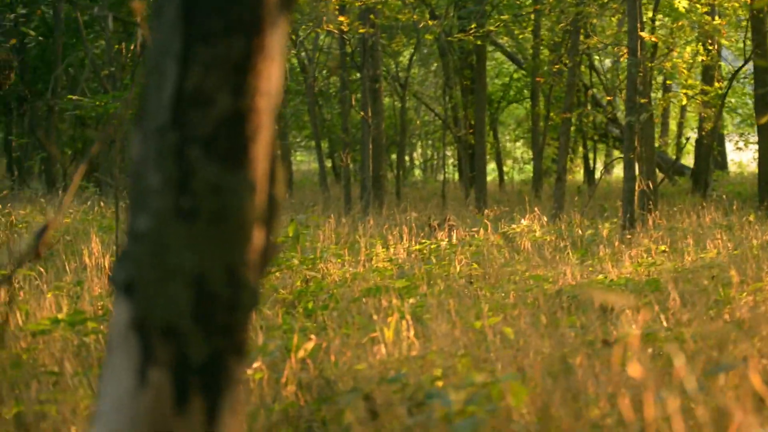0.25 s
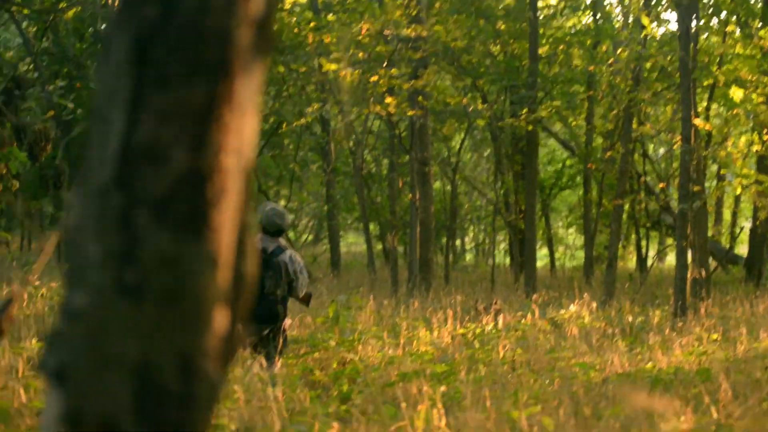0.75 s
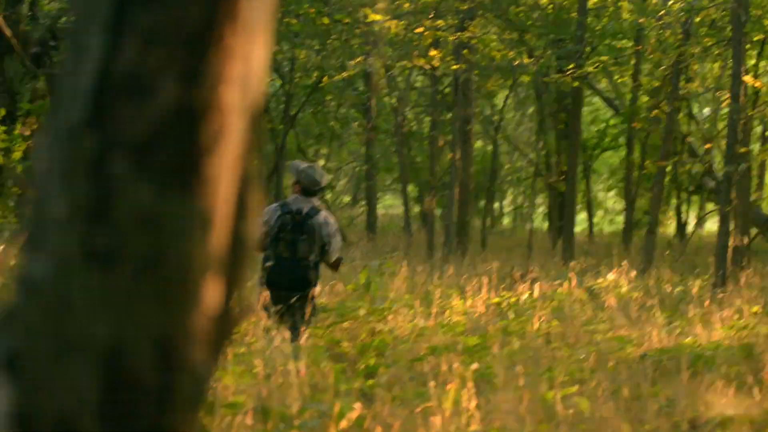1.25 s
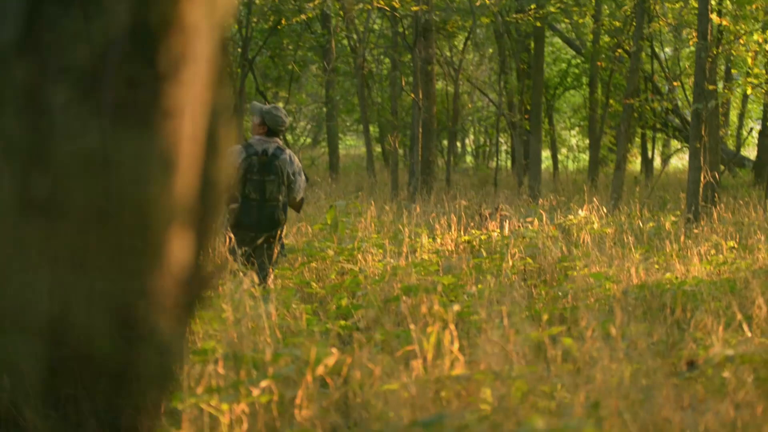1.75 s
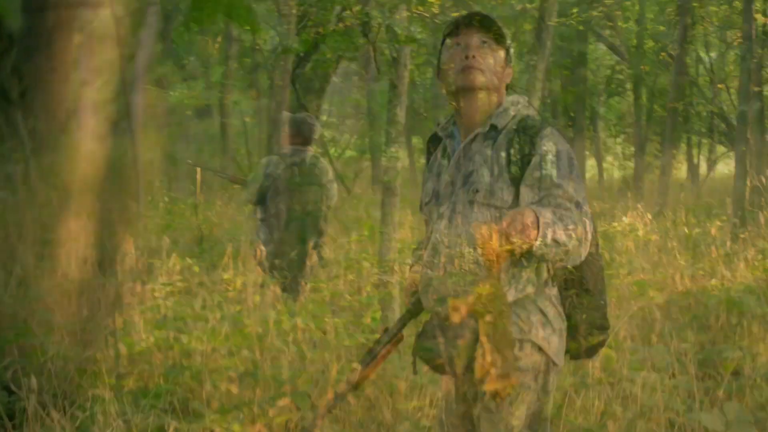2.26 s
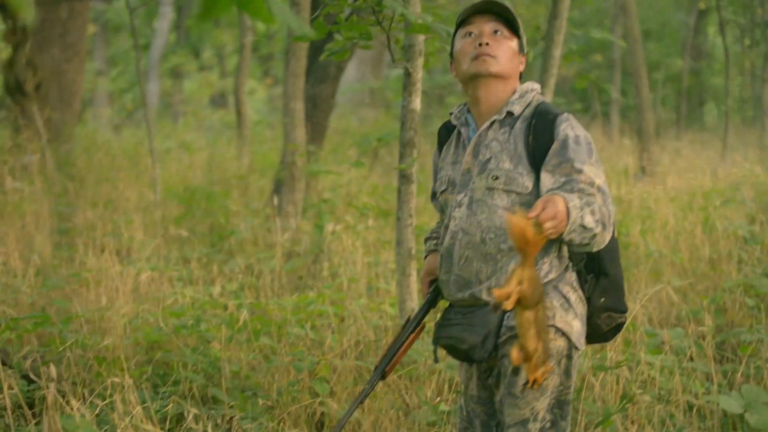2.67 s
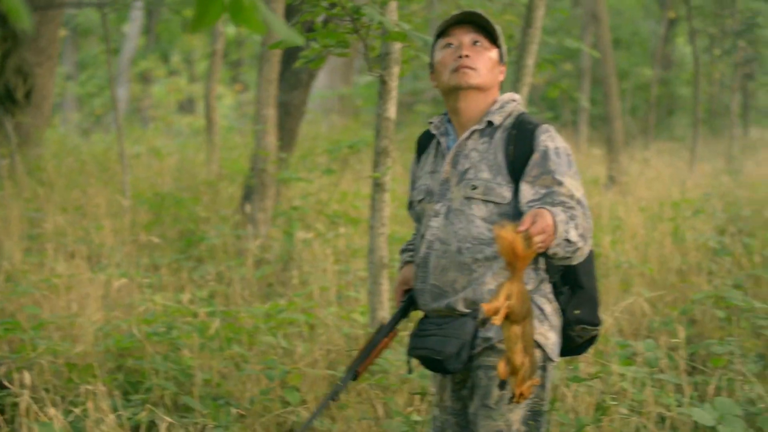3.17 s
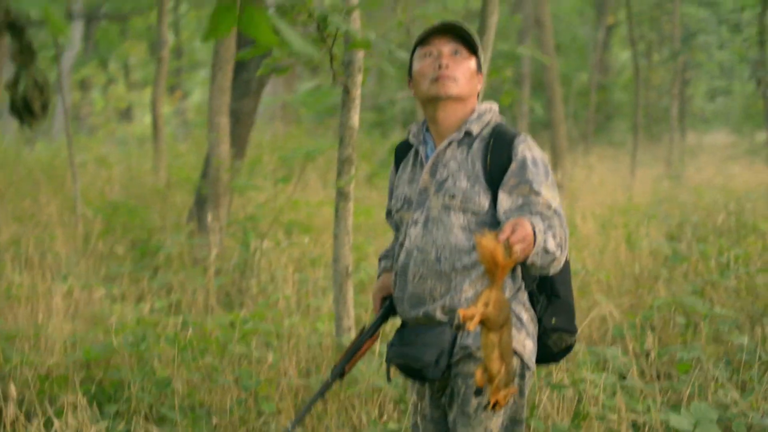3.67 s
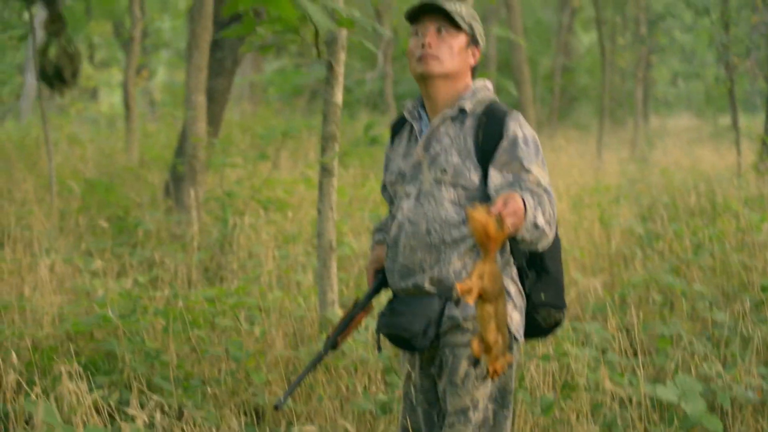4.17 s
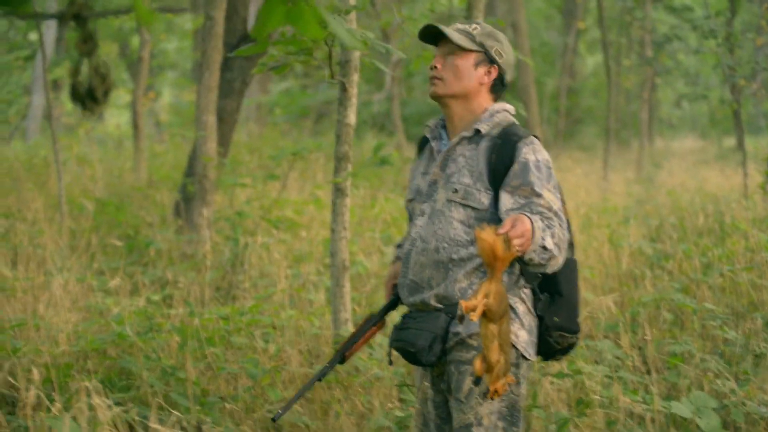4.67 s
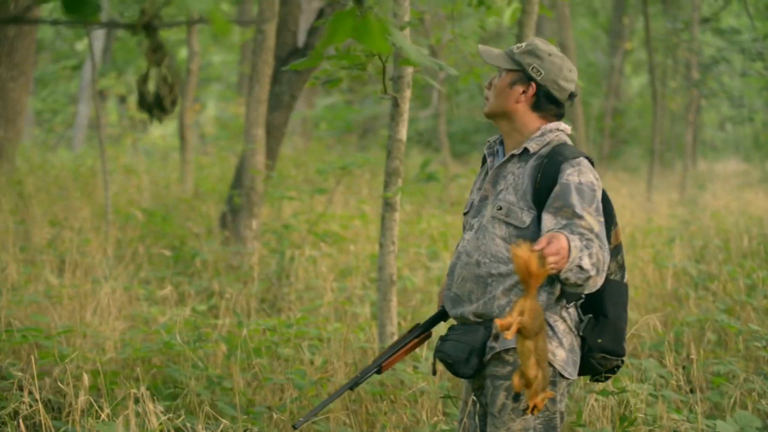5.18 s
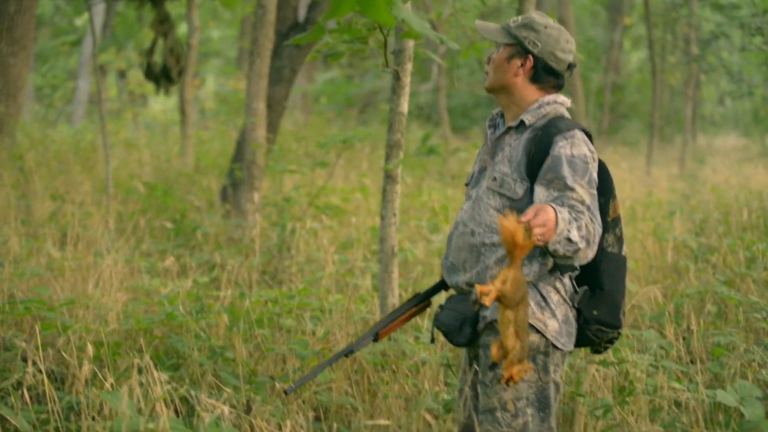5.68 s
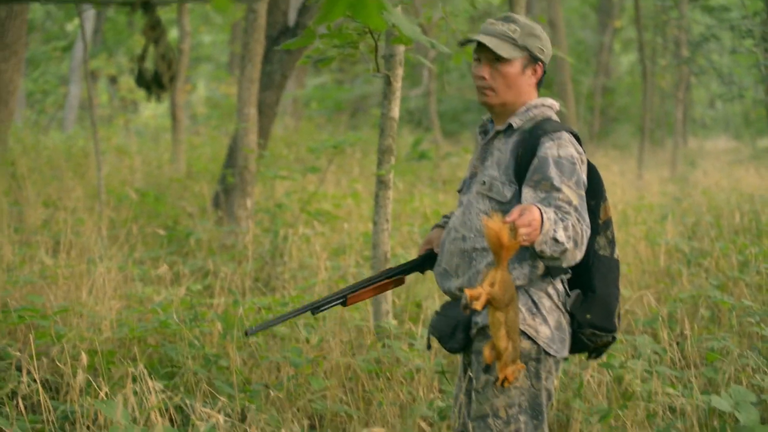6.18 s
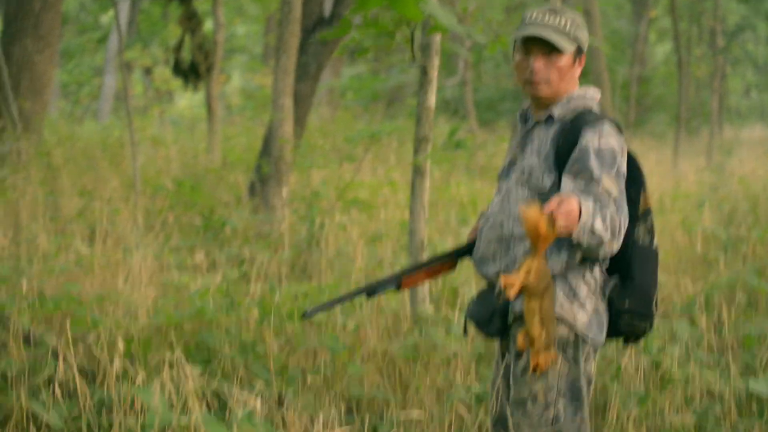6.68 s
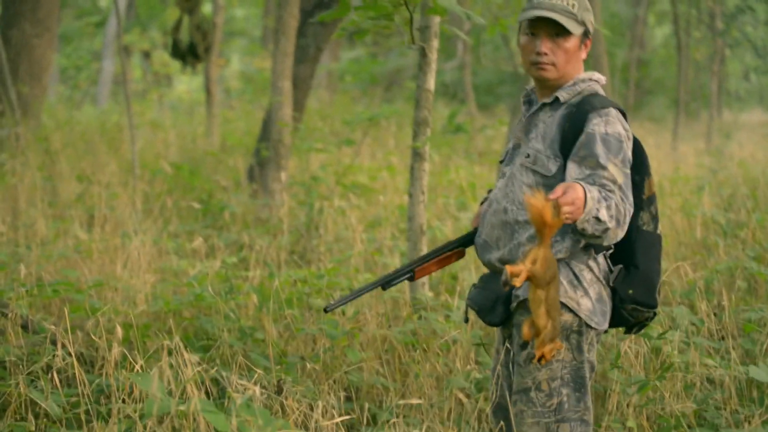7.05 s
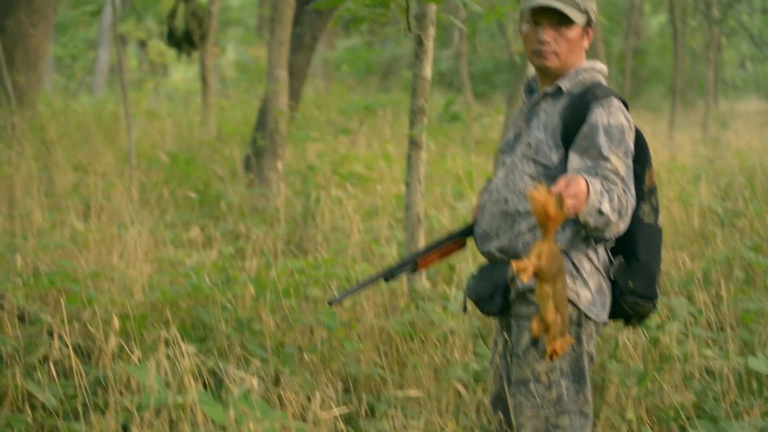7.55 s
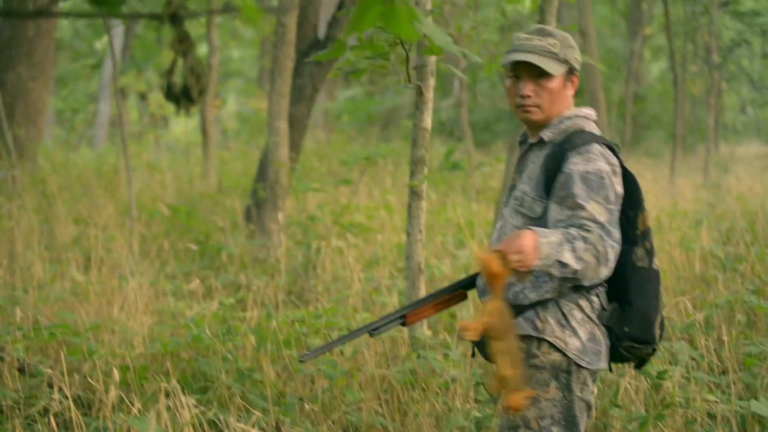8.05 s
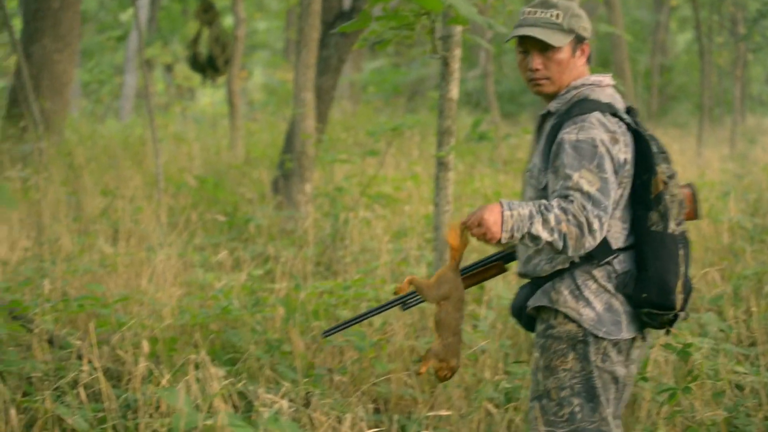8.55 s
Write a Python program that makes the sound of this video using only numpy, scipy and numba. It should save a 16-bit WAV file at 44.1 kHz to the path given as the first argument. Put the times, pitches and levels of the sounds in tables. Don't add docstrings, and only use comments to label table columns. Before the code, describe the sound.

Summer woodland, one centred microphone, with faint low traffic rumble and breeze beneath. From 0 s a near cicada grinds out buzzing phrases over a bright hissing insect chorus, peaking about 0.1, 0.8 and 1.5 s; each drone swells, clicks faster, drops in pitch and opens into a rasp, then shuts. Dry grass swishes around 0.7 and 1.2 s, stems snap, and a twig cracks sharply at 0.55 s. At 1.66 s the place changes abruptly: insects dip, recovering by 2.1 s. A slightly higher cicada then repeats every 0.7-0.8 s from 2.5 s, growing louder and quicker to the end at 8.8 s. Neighbouring cicadas add short steady hums. Shifting feet make light rustles and ticks, mostly 2.6-4.2 s, with few later. A faint bird slurs downward at 5.6 and 6.3 s, then gives eight evenly spaced chips until about 8.2 s.

```python
import sys
import numpy as np
from scipy import signal
from scipy.fft import rfft, irfft
from scipy.io import wavfile
from scipy.ndimage import uniform_filter1d
from numba import njit

SR = 44100
rng = np.random.default_rng(int(sys.argv[2]) if len(sys.argv) > 2 else 0)


def wav_out(sig):
    wavfile.write(sys.argv[1], SR, np.round(np.clip(np.atleast_2d(sig).T, -1, 1) * 32767).astype(np.int16))


def level_to_linear(level):
    exponent = np.asarray(level, float) / 20
    return 10 ** exponent


N = 388521
T = np.arange(N) / SR
CUT_S = 1.66


def level(x, db):
    return x * level_to_linear(db) / np.sqrt(np.mean(x ** 2))


def curve(table):
    return np.interp(T, *np.transpose(table))


@njit
def svf(x, hz, q):
    y, b, l, k = np.empty(len(x)), 0., 0., 1 / q
    for i in range(len(x)):
        g = np.tan(np.pi * hz[i] / SR)
        v = (b + g * (x[i] - l)) / (1 + g * (g + k))
        b, l, y[i] = 2 * v - b, l + 2 * g * v, k * v
    return y


def ring(x, hz, q, passes=2):
    centre_hz = np.full(N, hz, dtype=np.float64)
    for _ in range(passes):
        x = svf(x, centre_hz, q)
    return x


def colour(x, shape):
    hz, db = np.transpose(shape)
    f = np.log(np.fft.rfftfreq(N, 1 / SR) + 1)
    return irfft(rfft(x) * level_to_linear(np.interp(f, np.log(hz), db)), N)


def walk(rate):
    k = int(SR / rate)
    held = np.repeat(rng.standard_normal(N // k + 1), k)
    return 1.46 * uniform_filter1d(uniform_filter1d(held, k), k)[:N]


def trees(x, t60_s, wet_db):
    t = T[:SR // 2]
    tail = rng.standard_normal(len(t)) * level_to_linear(-60 * t / t60_s) * np.minimum(t / 0.011, 1)
    tail = level(tail, wet_db) / np.sqrt(len(t))
    first = T < CUT_S
    wet_first = signal.fftconvolve(x * first, tail)[:N] * first
    wet_later = signal.fftconvolve(x * ~first, tail)[:N] * ~first
    return x + wet_first + wet_later


# t/s, level/dB
RUMBLE_DB = [(0, -57), (1.64, -66), (1.8, -66.5), (2.1, -56.5), (3, -57.5), (4.4, -63.5), (8.81, -63)]


def rumble():
    noise = level(ring(rng.standard_normal(N), 140, 1.65, passes=1), -5)
    return noise * level_to_linear(curve(RUMBLE_DB) + 1.04 * walk(2.75))


# f/Hz, level/dB per Hz
AIR = [(15, -40), (25, -5), (138, 1), (243, -5), (403, -4.5), (629, -8), (1510, -11), (1830, -15),
       (2100, -20), (2600, -14.5), (3380, -21), (5720, -120)]


def open_air():
    return level(colour(rng.standard_normal(N), AIR), -64) * level_to_linear(0.91 * walk(3.58))


# t_mid/s, level/dB, half length/s
GUSTS = [
    (2.2, -64, .25),
    (3.9, -63.5, 0.33),
    (4.9, -67.5, .3),
    (5.9, -66.5, 0.39),
    (8.6, -66.5, .4),
]


def breeze():
    gusts = sum(level_to_linear(db) * np.exp(-((T - s) / half_s) ** 4) for s, db, half_s in GUSTS)
    return level(ring(rng.standard_normal(N), 360, 1.0), 0) * gusts


# f/Hz, level/dB per Hz
FIRST_CHORUS = [(1500, -56), (2300, -28.5), (2900, -23.5), (3300, -7), (4100, -8), (5100, 1.5), (6000, 0),
                (6700, -17), (7600, -12.5), (8200, -17.5), (8800, -30), (12000, -32), (15700, -24)]
LATER_CHORUS = [(1500, -53), (2300, -35), (2900, -23.5), (3300, -11), (4200, -7), (5100, 1.5), (5900, -2),
                (6900, -9), (7500, -16.5), (8200, -16.5), (8900, -28.5), (12300, -39), (14700, -30.5),
                (15700, -36)]
# t/s, level/dB
CHORUS_DB = [(0, -28), (1.656, -32), (1.664, -23), (2.3, -33), (4, -30.5), (6, -29), (8, -26),
             (8.81, -27.5)]


def chorus():
    white, bands, swell = rng.standard_normal(N), 0, walk(1.29)
    for hz in 1900 * 2 ** np.arange(0, 3.2, 1 / 3):
        flicker = level_to_linear(0.79 * swell + 3.2 * walk(6.5))
        bands = bands + ring(white, hz, 3.4, passes=1) * flicker / np.sqrt(hz)
    before = level(colour(bands, FIRST_CHORUS), 0)
    after = level(colour(bands, LATER_CHORUS), 0)
    return np.where(T < CUT_S, before, after) * level_to_linear(curve(CHORUS_DB))


# t/s, level/dB
SLURS = [
    (5.56, -68),
    (6.328, -62),
]
# length/s, f_start/Hz, f_end/Hz
SLUR = (.15, 2050, 1530)
CHIP_DB = [-66, -54.5, -53.5, -54.5, -58, -56, -56, -57]
# length/s, f_start/Hz, f_end/Hz
CHIP = (.028, 1800, 2040)


def bird():
    chips_s, chip_gap_s = 6.642, .2242
    chip_bend = 2.3
    echo_s, echo_db = 0.066, -8
    notes = [(s, db, *SLUR, 1) for s, db in SLURS]
    notes += [(chips_s + k * chip_gap_s, db, *CHIP, chip_bend) for k, db in enumerate(CHIP_DB)]
    out = np.zeros(N)
    for s, db, length_s, hz0, hz1, bend in notes:
        u = np.clip((T - s) / length_s, 0, 1)
        cycles = np.cumsum(hz0 + (hz1 - hz0) * u ** bend) / SR
        out += level_to_linear(db) * np.sin(np.pi * u ** .8) * np.sin(2 * np.pi * cycles)
    return trees(out + level_to_linear(echo_db) * np.roll(out, int(echo_s * SR)), 0.33, -1.26)


def clicks(s, size):
    at = np.floor(s * SR)[:, None] + np.arange(-7, 9)
    lag = at - s[:, None] * SR
    taps = np.sinc(lag) * np.cos(lag * np.pi / 16) ** 2 * size[:, None]
    return np.bincount(np.clip(at, 0, N).astype(int).ravel(), taps.ravel(), N + 1)[:N]


def drums(rate_hz, late_ms, loose):
    weak_db, scatter_db, jitter_ms = -5, 1.5, .062
    beats = np.cumsum(rate_hz) / SR
    k = np.arange(1, int(beats[-1]))
    second = k % 2
    s = np.interp(k, beats, T)
    loose = np.interp(s, T, loose + 0 * T)
    late_ms = np.interp(s, T, late_ms + 0 * T)
    chance = rng.standard_normal((2, len(k)))
    size = level_to_linear(weak_db * second + scatter_db * loose * chance[1])
    shift_ms = jitter_ms * loose * chance[0] + late_ms * second
    return clicks(s + shift_ms / 1000, size) * np.sqrt(SR / rate_hz)


# click rate/Hz, lag of the second drum/ms
NEIGHBOURS = [(351, .15), (373.2, .3), (392.6, .15), (393.1, .25)]
NEIGHBOUR_BELLY_HZ = [3200, 3270, 3130, 3900]
# t/s, length/s, level/dB
HUMS = [
    [(1.84, .12, -33.5), (3.42, 0.17, -42.5), (4.42, .12, -39), (5.32, 0.13, -34.5), (6.2, .145, -32),
     (7.95, 0.2, -38)],
    [(7.088, 0.15, -35.5)],
    [(1.69, .11, -30), (8.322, 0.13, -33)],
    [(7.76, 0.19, -40), (8.4, 0.16, -38)],
]


def neighbours():
    out = 0
    for (beat_hz, late_ms), hz, hums in zip(NEIGHBOURS, NEIGHBOUR_BELLY_HZ, HUMS):
        hum = ring(drums(np.full(N, beat_hz), late_ms, loose=0.14), hz, 2.5)
        swells = 0
        for s, length_s, db in hums:
            u = np.clip((T - s) / length_s, 0, 1)
            swells = swells + level_to_linear(db) * np.abs(np.sin(np.pi * u)) ** 0.26
        out = out + level(hum, 0) * swells
    low_cut = signal.cheby2(6, 40, 2350, "high", fs=SR, output="sos")
    return trees(signal.sosfilt(low_cut, out), .15, -5)


# t_mid/s, level/dB, half length/s
STRIDES = [(.15, -63.5, .3), (.7, -52.5, 0.14), (1.2, -52.5, 0.27), (1.633, -60, 0.15),
           (2.079, -69.5, 0.22), (2.78, -59.5, .25), (3.305, -57.5, 0.22), (3.85, -66.5, 0.39),
           (5.0, -69, 0.25), (5.878, -71, .33), (7.69, -73, 0.31), (8.553, -71, 0.43)]


def strides():
    first_stir_db, stir_db = -58.5, -80.5
    first = T < CUT_S
    sweeps = 0
    for s, db, half_s in STRIDES:
        same_spot = first == (s < CUT_S)
        sweeps = sweeps + level_to_linear(db) * np.exp(-np.abs((T - s) / half_s) ** 3.1) * same_spot
    return sweeps + level_to_linear(np.where(first, first_stir_db, stir_db + curve(FADER_DB)))


def snap(s, db, hz, thud_db, body_db, crack_db, cycles=1.54):
    t = T[:2000]
    pulse = 0
    for f, part_db in [(hz, 1.5), (300, thud_db), (1100, body_db), (1850, crack_db)]:
        decay, rise = np.exp(-t * f / cycles), np.minimum(t * f * 2.36, 1)
        pulse = pulse + level_to_linear(part_db) * np.sin(2 * np.pi * f * t) * decay * rise
    out, i = np.zeros(N + len(t)), int(s * SR)
    out[i:i + len(t)] = level_to_linear(db) * pulse
    return out[:N]


# f/Hz, level/dB per Hz
GRASS = [(88, -51), (150, -22), (263, -3), (452, 0), (1090, -1.5), (1280, -0.5), (2190, -7), (2800, -4),
         (3640, -29), (6160, -120)]
# t/s, peak/dB, f/Hz, breadth/dB
WALK_TICKS = [(0.106, -38, 938, -5), (0.269, -43.5, 377, 8), (0.416, -38, 1688, -4), (0.439, -32, 2120, 0),
              (0.473, -38, 1348, -3), (0.505, -44, 557, 3), (0.633, -33, 475, 7), (0.679, -23, 874, 3),
              (0.693, -33, 709, -5), (0.756, -35, 383, -3), (0.885, -40.5, 1170, 8), (0.996, -37, 393, 3),
              (1.064, -19.5, 1271, -19), (1.096, -34, 1016, 2), (1.109, -29, 890, -1.5),
              (1.153, -38, 1540, .1), (1.219, -34, 1275, .1), (1.279, -26, 543, -6),
              (1.363, -26.5, 764, -10), (1.509, -35, 1324, -2.5)]
# t/s, peak/dB, f/Hz, breadth/dB
STAND_TICKS = [(2.615, -44, 2355, .1), (2.694, -41, 1195, -2.5), (2.721, -41, 481.3, 6),
               (2.783, -42, 1276, 4), (2.865, -36, 1360, -1.5), (2.879, -39, 1238, 3),
               (3.129, -40, 666, -1), (3.181, -44, 972, .1), (3.328, -34, 500, 9.5), (3.53, -44, 938, 10),
               (3.686, -49, 342, 2.5), (3.714, -38.5, 1214, -7), (3.81, -47, 1265, 7), (3.972, -37, 920, 8),
               (4.132, -39.5, 2360, -1.5), (4.185, -37, 1254, -10), (4.227, -38, 1354, -17),
               (4.867, -49, 883, 2.5), (6.641, -37, 2415, -3), (7.148, -41.5, 531, 6), (7.452, -49, 297, 5)]
TWIG_S = [.5461, .5482, .5533, .5602]
# peak/dB, f/Hz
TWIG = [
    (-6.5, 2120),
    (-13.5, 755),
    (-22.5, 1500),
    (-39.5, 1300),
]


def walker():
    chance = rng.random((2, N))
    crackle = (chance[0] < 2500 / SR) * level_to_linear(-2.2 * np.log(chance[1] + 1e-3)) * rng.standard_normal(N)
    swish = level(colour(crackle, GRASS), 0) * strides() * level_to_linear(0.51 * walk(34))
    snaps = 0
    for s, db, hz, wide_db in WALK_TICKS + STAND_TICKS:
        thud_db = -19.5 + wide_db - 0.65 * (db + 48)
        snaps = snaps + snap(s, db, hz, thud_db, -6 + wide_db, -1 + wide_db)
    for s, (db, hz) in zip(TWIG_S, TWIG):
        snaps = snaps - snap(s, db, hz, -11.5, -32, 4, cycles=0.91)
    splinter = level_to_linear(-21) * ring(rng.standard_normal(N), 8000, 8.6, passes=1)
    splinter = splinter * np.exp(-np.abs(T - .553) / 0.02) * (T > TWIG_S[0])
    low_cut = signal.butter(3, 150, "high", fs=SR, output="sos")
    return trees(swish + signal.sosfilt(low_cut, snaps) + splinter, .12, -13)


RIBS = [(23, .6), (41, .55)]


def ribs(drum):
    for late, share in RIBS:
        taps = np.r_[1, np.zeros(late - 1), -share]
        drum = signal.lfilter(taps[::-1], taps, drum)
    return drum


def belly(drum, hz, opening, quick, first):
    wide_db, wide_gain_db, first_wide_db = -11.5, 23, -7.5
    low_hz, low_db, later_low_db = 3360, -4.5, -11
    sharp_db, sharp_q = -16.5, 105
    main = level(ring(drum, hz, 5.17), 0)
    wide_db = wide_db + (wide_gain_db + first_wide_db * first) * opening ** 0.73 * quick
    wide = level(ring(ribs(drum), .6 * hz + 2000, 2.1), 0) * level_to_linear(uniform_filter1d(wide_db, size=300))
    low = level(ring(drum, low_hz, 4.5), low_db) * np.where(first, 1, level_to_linear(later_low_db))
    low = low * quick ** 4 * level_to_linear(11.5 * opening ** 2)
    sharp = level(ring(drum, hz, sharp_q, passes=1), sharp_db) * (1 - quick)
    edges = signal.cheby2(6, 40, (2450, 9000), "band", fs=SR, output="sos")
    return signal.sosfilt(edges, main + wide + low + sharp)


# t_climax/s, drone level/dB, climax level/dB
PHRASES = [(.125, -33.5, -24), (.835, -34, -24.5), (1.545, -33.5, -30), (2.51, -40, -27.5),
           (3.335, -40, -26), (4.139, -37.5, -24), (4.93, -35.5, -22.5), (5.71, -34, -23.5),
           (6.475, -33.5, -21.5), (7.225, -32.5, -22.5), (7.97, -31.5, -21.5), (8.715, -31, -20.5)]
# t from climax/s, quickening 0-1, climax share 0-1, belly f/Hz
COURSE = [
    (-0.6, .01, .01, 5020),
    (-.5, .01, .03, 5660),
    (-.2, .05, 0.3, 5667),
    (-.08, 0.28, 0.27, 5750),
    (-.03, 0.62, 0.65, 5600),
    (.01, .85, 0.9, 5430),
    (0.056, 1.1, 0.66, 4700),
    (.125, 1.15, 0.44, 3600),
    (.16, 0.08, 0.84, 4050),
]


def cicada():
    first_drone_hz, first_final_hz = 291.5, 420.1
    warming_from_s, drone_hz, drone_hz_per_s = 2.51, 245, 3.3
    final_hz, cold_hz, warming_s = 414, 18.6, 5.5
    first_ratio, later_ratio = .94, 1.019
    first_lag_ms, later_lag_ms = .245, .255
    shut_hz, open_hz, open_loss_db = 5840, 3680, -11.5
    overtone_db, overtone_loss_db = -26.5, -23

    rows, course = np.array(PHRASES, float), np.array(COURSE)
    which = np.minimum(np.searchsorted(rows[:, 0] + course[-1, 0], T), len(rows) - 1)
    climax_s, drone_db, peak_db = rows[which].T
    first, warm_s = climax_s < CUT_S, climax_s - warming_from_s
    slow_hz = np.where(first, first_drone_hz, drone_hz + drone_hz_per_s * warm_s)
    fast_hz = np.where(first, first_final_hz, final_hz - cold_hz * np.exp(-warm_s / warming_s))
    ratio = np.where(first, first_ratio, later_ratio)
    lag_ms = np.where(first, first_lag_ms, later_lag_ms)

    quick, share, belly_hz = (np.interp(T - climax_s, course[:, 0], c) for c in course[:, 1:].T)
    quick = np.clip(quick, 0, 1)
    opening = np.clip((shut_hz - belly_hz) / (shut_hz - open_hz), 0, 1)
    drum = drums(slow_hz + (fast_hz - slow_hz) * quick, lag_ms, loose=1.06 - quick ** 2)
    hz = uniform_filter1d(belly_hz * ratio, size=200)
    swell_db = (peak_db - drone_db) * share
    overtone_db = overtone_db + overtone_loss_db * opening ** 1.2 + 49 * (1 - ratio) - 0.33 * swell_db
    overtone = ring(ring(drum, hz * 2.02, 8.9, passes=1), hz * 1.774, 6.9, passes=1)
    overtone = level(overtone, 0) * level_to_linear(overtone_db)
    song_db = uniform_filter1d(drone_db + swell_db + open_loss_db * opening ** 2, size=300)
    return trees((belly(drum, hz, opening, quick, first) + overtone) * level_to_linear(song_db), .15, -4.5)


# t/s, level/dB
FADER_DB = [
    (0, 0),
    (1.656, 3),
    (1.663, -14.5),
    (1.77, -15.5),
    (1.85, -11),
    (1.95, -4.5),
    (2.1, 0.5),
    (2.4, 3.5),
    (8.81, 0),
]


def scene():
    faded = cicada() + neighbours() + chorus() + open_air() + bird()
    mono = faded * level_to_linear(curve(FADER_DB)) + walker() + rumble() + breeze()
    return np.array([mono, mono])


def roll_off(x):
    return signal.sosfilt(signal.butter(12, 16750, fs=SR, output="sos"), x)


def record(dry):
    top = signal.ellip(10, .2, 70, 15700, fs=SR, output="sos")
    return roll_off(signal.sosfilt(top, dry))


dry = scene()
out = record(dry)
wav_out(out)
```